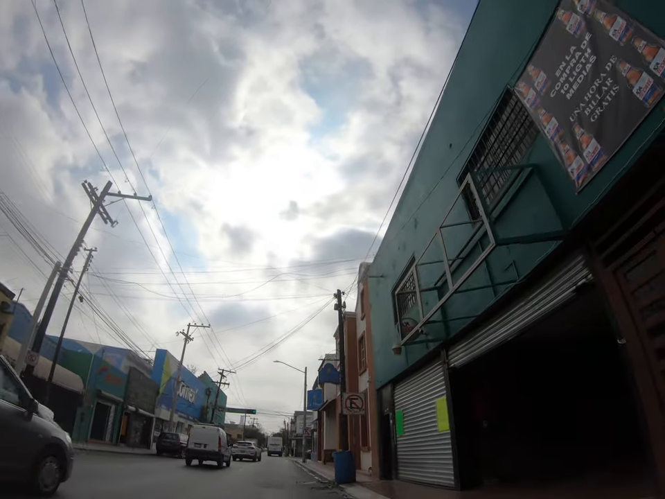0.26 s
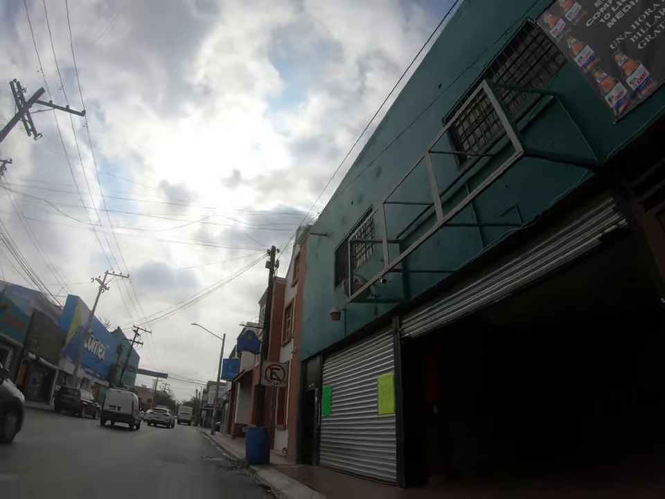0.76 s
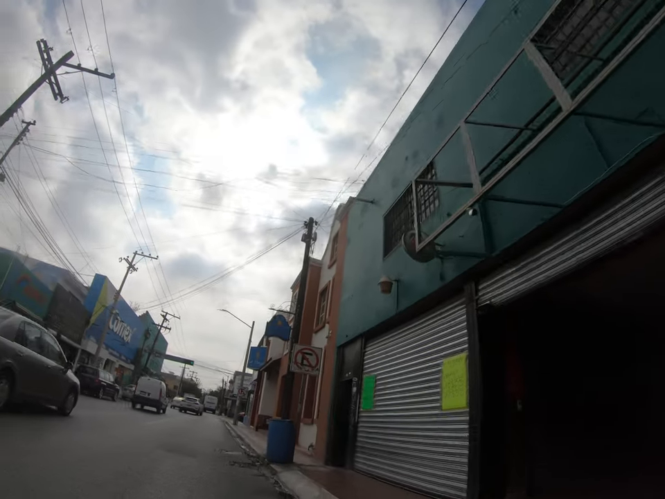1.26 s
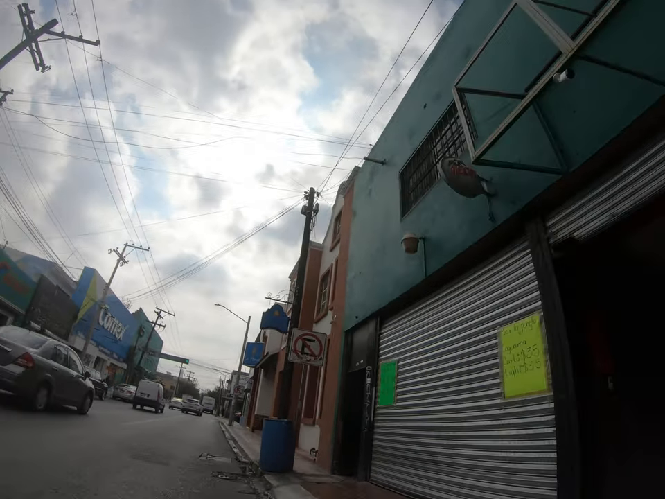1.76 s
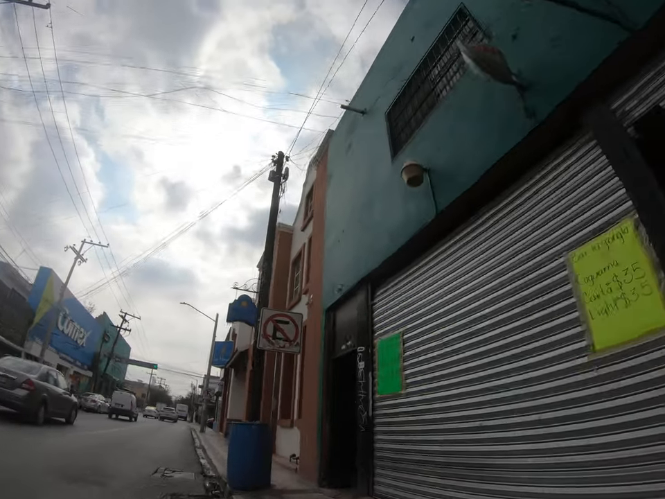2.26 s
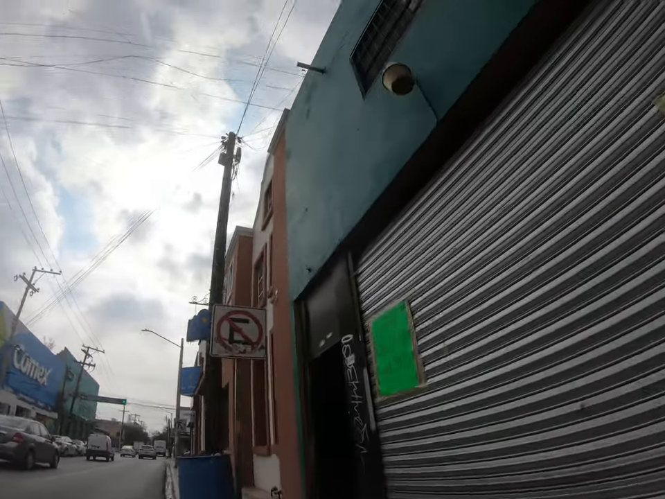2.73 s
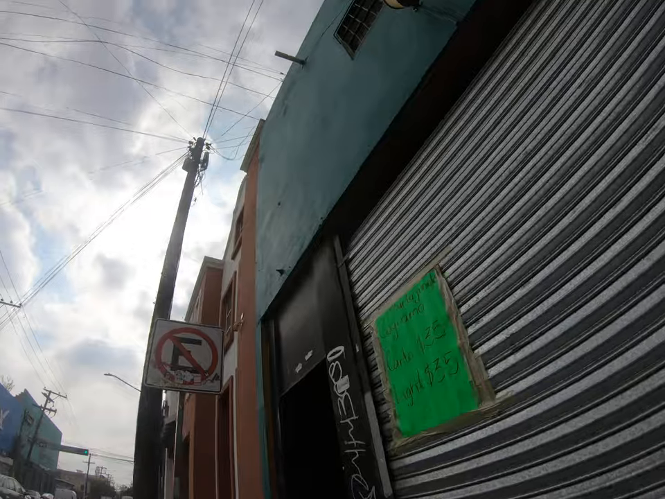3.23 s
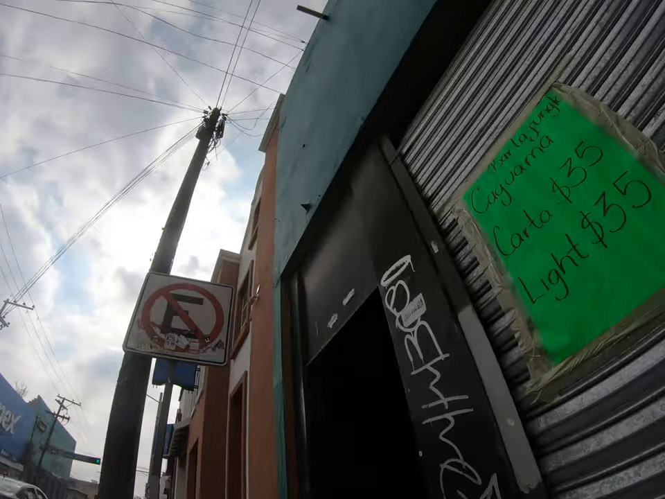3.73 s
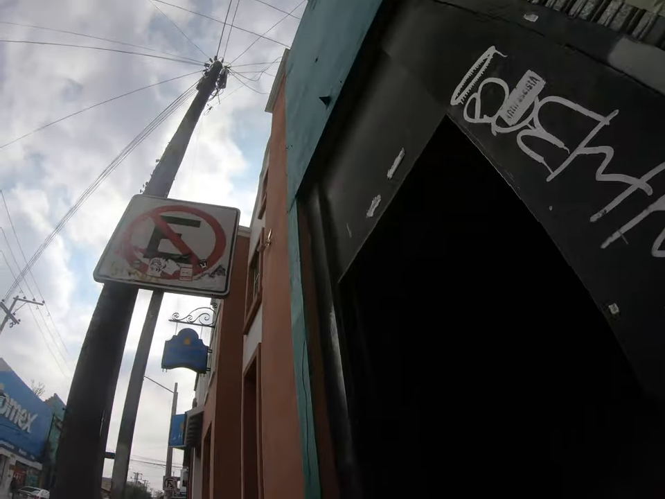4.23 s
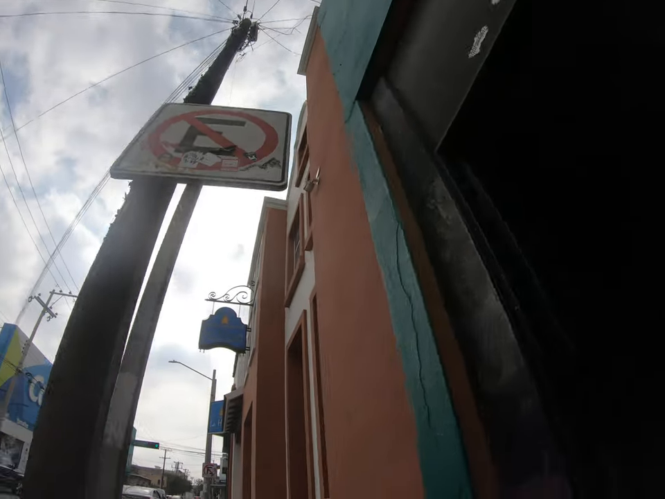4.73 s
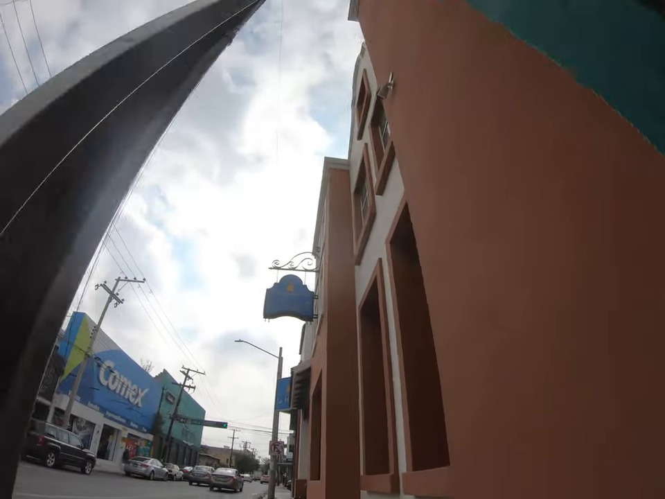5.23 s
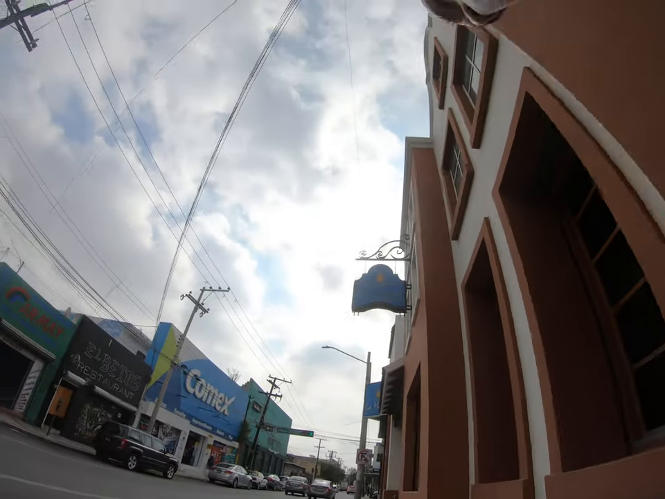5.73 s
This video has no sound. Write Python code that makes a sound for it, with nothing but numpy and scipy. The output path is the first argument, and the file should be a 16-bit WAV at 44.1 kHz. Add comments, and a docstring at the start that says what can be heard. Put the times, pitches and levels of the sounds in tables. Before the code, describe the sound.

A kick scooter is heard very close, rolling over rough concrete beside a street. From 0 to 0.7 s a deep deck rumble grows under tyre hum, fine metallic buzz, gritty crunches and ticking, with knocks near 0.3 s. Hard double clanks hit at 1.05 s, and more follow at 1.4, 1.5, 1.6 and 1.7 s. A thin, fluttering brake squeak sounds from about 1.7 to 2 s as the scooter slows. A knock at 2.1 s and a dense clatter with cracking stones at 2.5-2.65 s precede smooth paving, where the rumble drops sharply. Lighter knocks and scrapes continue around 2.9-3.7 s. A low throbbing drone swells from 3.5 to 4.8 s, strongest around 4.2-4.5 s, with a heavy thud at 4.2 s. Ringing frame clanks cluster at 4.9-5.1 s, more hits and a dry snap at 5.25-5.4 s, and a final pair at 5.6 s. Soft traffic wash persists, its hiss rising at the end.

```python
"""Rough concrete rumbles under a kick scooter close to the microphone, with traffic all around the sidewalk.
Bumps ring resonances of deck, tyres and steering column; loose fittings tick and buzz; wheels crunch over grit.
Joints clank the frame and the brake squeaks; the scooter slows and smooth paving lets the rumble drop away.
A low drone of beating partials swells briefly; shop fronts echo the hits; the street is shaped noise."""
import sys
import numpy as np
from scipy import signal
from scipy.fft import rfft, irfft
from scipy.io import wavfile
from scipy.ndimage import uniform_filter1d

SR = 44100
rng = np.random.default_rng(int(sys.argv[2]) if len(sys.argv) > 2 else 0)


def unload_audio(sound):
    """Save the sound as a 16-bit wav file, at the path given as the first command line argument."""
    columns = np.transpose(np.atleast_2d(sound))
    # keep every value between -1 and 1, then stretch to whole-number steps
    steps = np.round(np.clip(columns, -1, 1) * 32767)
    wavfile.write(sys.argv[1], SR, steps.astype(np.int16))


N = 263718
TIME = np.arange(N) / SR   # seconds


def from_db(db):
    """Decibels to gain."""
    return 10 ** (np.asarray(db) / 20)


def rms_one(x):
    """Scale to unit rms."""
    return x / np.sqrt(np.mean(x ** 2) + 1e-20)


def in_time(rows):
    """Each column of a curve, sample by sample."""
    s, *columns = np.transpose(rows)
    return [np.interp(TIME, s, c) for c in columns]


def drift(rate):
    """Smooth random wander of spread 1, faster with rate; made at a fortieth of the sample rate."""
    r = np.exp(-80 * np.pi * rate / SR)
    noise = rng.standard_normal(N // 40 + 2002)
    slow = signal.lfilter([1], [1, -2 * r, r * r], noise)[2000:]   # settled part only
    return np.interp(np.arange(N) / 40, np.arange(len(slow)), rms_one(slow))


def band(x, low_hz, high_hz, order=2):
    """Causal band-pass."""
    edges = [low_hz, min(high_hz, .45 * SR)]
    return signal.sosfilt(signal.butter(order, edges, "band", fs=SR, output="sos"), x + 1e-18)


def colour(x, spectrum):
    """Causal (minimum-phase) filter with the given spectrum and unit power gain."""
    hz, db = np.transpose(spectrum)
    grid = np.log(np.maximum(np.fft.rfftfreq(8192, 1 / SR), 1))
    outside = np.abs(grid - np.clip(grid, np.log(hz[0]), np.log(hz[-1])))
    # beyond the listed frequencies the spectrum falls steeply
    gain = from_db(np.interp(grid, np.log(hz), db) - 30 * outside)
    cepstrum = irfft(np.log(gain))
    response = irfft(np.exp(rfft(2 * cepstrum[:4096], 8192)))
    return signal.fftconvolve(x, response / np.linalg.norm(response))[:N]


def resonate(x, resonances):
    """Parallel resonances with alternating signs."""
    out = 0
    for k, (hz, width, db) in enumerate(resonances):
        r = np.exp(-np.pi * width / SR)
        numerator = np.array([1, 0, -1]) * (1 - r * r) / 2
        denominator = [1, -2 * r * np.cos(2 * np.pi * hz / SR), r * r]
        out = out + (-1) ** k * from_db(db) * signal.lfilter(numerator, denominator, x + 1e-18)
    return out


def ring(x, hz, t60):
    """A unit click sets a decaying sine of starting height 1 ringing."""
    r, w = from_db(-60 / (t60 * SR)), 2 * np.pi * hz / SR
    return signal.lfilter([0, np.sin(w)], [1, -2 * r * np.cos(w), r * r], x + 1e-18)


def clicks(times, db):
    """Single contacts at the given moments."""
    out = np.zeros(N)
    out[(np.atleast_1d(times) * SR).astype(int)] = from_db(db)
    return out


def bursts(times, db, t60, rise_s=0.0016, uneven_db=6.0):
    """Each contact chatters: an uneven spray of tiny impacts that builds quickly and dies away."""
    out, chatter = np.zeros(N), from_db(uneven_db * drift(190))
    for s, gain, decay in zip(times, from_db(db), np.broadcast_to(t60, len(times))):
        start = int(s * SR)
        age = TIME[:min(SR // 3, N - start)]
        shape = np.minimum(age / rise_s, 1) * from_db(-60 * age / max(decay, .002))
        spray = shape * chatter[start:][:len(age)] * rng.standard_normal(len(age))
        # the blow's energy is shared among its impacts
        out[start:][:len(age)] += gain * spray * np.linalg.norm(shape) / np.linalg.norm(spray)
    return out


def grains(per_s, spread_db):
    """Random contacts with stones of uneven size; rms 1."""
    sizes = from_db(spread_db * np.minimum(rng.exponential(1, N), 4)) * rng.choice([-1, 1], N)
    return rms_one(sizes * (rng.random(N) < per_s / SR))


def steady(x, seconds):
    """Hold the short-term rms at 1, as a steady load on the wheels does."""
    return x / np.sqrt(np.abs(uniform_filter1d(x ** 2, int(seconds * SR))) + 1e-12)


def small_parts(x, ringing_db, t60, count=70):
    """Many small resonances of bolts and brackets ring on after each contact."""
    age = TIME[:SR // 4]
    hz = np.geomspace(600, 14000, count) * np.exp(rng.normal(0, .02, count))
    strengths = np.sqrt(hz) * rng.choice([-1, 1], count)
    response = strengths @ np.sin(2 * np.pi * hz[:, None] * age) * from_db(-60 * age / t60)
    rings = signal.fftconvolve(x, response / np.linalg.norm(response))[:N]
    return (x + from_db(ringing_db) * rings) / np.hypot(1, from_db(ringing_db))


FAVOUR_WIDTH = 0.25   # share of the favoured pitch
FAVOUR_DB, OFF_FAVOUR_DB = -1, -2.5   # the favoured resonance; the unfiltered contact


def favour(x, hz):
    """The point of contact brings out one broad resonance."""
    return from_db(OFF_FAVOUR_DB) * x + resonate(x, [(hz, FAVOUR_WIDTH * hz, FAVOUR_DB)])


# Stretches of paving, rough concrete first.
# Each row: moment the wheels reach it in seconds, rumble of the deck in dB.
PAVING = [(0, -25.5), (.28, -22.5), (.72, -19.5), (2.1, -21), (2.69, -35.5), (3.18, -32.5), (3.9, -36),
          (4.9, -36), (5.34, -24), (5.43, -36)]
DECK_SETTLE_S = 0.0065   # time constant of the deck taking up a new surface


def deck_level():
    """The deck's rumble in dB: each stretch of paving sets a level, and the deck settles to it."""
    s, db = np.transpose(PAVING)
    stretch = np.maximum(np.searchsorted(s, TIME, "right") - 1, 0)
    steps = from_db(db[stretch])
    r = np.exp(-1 / (DECK_SETTLE_S * SR))
    return 20 * np.log10(signal.lfilter([1 - r], [1, -r], steps, zi=[r * steps[0]])[0])


# The scooter's speed, told by its tyres.
# Each row: time in seconds, level of the tyres' drone in dB on a scale where cruising is CRUISE_DB.
SPEED = [(0.0, -26), (0.25, -27.5), (0.5, -30), (1.15, -26), (1.3, -30), (1.72, -30), (1.95, -36),
         (2.62, -42), (2.74, -41.5), (2.98, -44), (3.81, -42.5), (3.93, -44), (4.48, -45.5), (4.87, -40.5),
         (4.93, -39), (5.5, -43), (5.66, -57), (5.98, -45)]
CRUISE_DB = -28


def speed_level():
    """Speed in dB relative to cruising."""
    return in_time(SPEED)[0] - CRUISE_DB


# Resonances of the deck, the tyres and the steering column.
# Each row: pitch in Hz, width in Hz, relative level in dB.
DECK = [(33, 28, -9), (70.4, 12.6, 2.5), (104.8, 37.7, -6.5), (136.2, 58, -12)]
TYRE = [(262, 46, -2.5), (314, 30, 2.5), (372.6, 45, 0), (456, 240, -14)]
COLUMN = [(760, 23, 5.5), (1244, 140, -0.5), (1910, 130, 6), (2720, 1300, -18)]
# Spectra of sand ground under the wheels and of its bright grit.
# Each row: frequency in Hz, relative density in dB per Hz.
GRINDING = [(350, -3), (550, 13), (850, 12), (1350, -3), (1650, -13.5), (2000, -12), (2400, -25.5),
            (2850, -19), (3400, -22.5), (4500, -30.5)]
GRIT = [(1500, -8.5), (2800, 19.5), (4300, 10.5), (6300, -1), (8500, -16.5), (11000, -26), (13000, -37.5),
        (16000, -43.5)]
DECK_LUMPS_DB, DECK_LUMPS_PER_S = 1.6, 11   # its uneven surging: spread, wander rate
TYRE_DB, COLUMN_DB = -27.5, -52.5   # at cruising speed
GRIND_DB, GRIND_FOLLOWS = -39.5, 0.47   # at cruising speed; share of the speed's swing in dB
GRIT_DB, GRIT_FOLLOWS = -69.5, 0.7


def rolling():
    """The paving's bumps shake the deck, tyres and steering column; sand grinds under the wheels."""
    speed_db = speed_level()
    deck_shake = band(resonate(grains(per_s=330, spread_db=1.5), DECK), 26, 230)
    deck = steady(deck_shake, seconds=0.06)
    tyre_shake = band(resonate(grains(per_s=900, spread_db=3), TYRE), 150, 580)
    tyre = steady(tyre_shake, seconds=0.16)
    bumps = grains(per_s=450, spread_db=5)
    column = rms_one(band(resonate(bumps, COLUMN), 430, 3100)) * from_db(1.8 * drift(9.2))
    stones = grains(per_s=1100, spread_db=3.5)
    grind = colour(stones, GRINDING) * from_db(1.5 * drift(17))
    fine_stones = colour(grains(per_s=5500, spread_db=4.0), GRIT) * from_db(.8 * drift(30))
    grit = small_parts(fine_stones, ringing_db=-6.5, t60=0.37)

    rumble = from_db(deck_level() + DECK_LUMPS_DB * drift(DECK_LUMPS_PER_S)) * deck
    hum = from_db(speed_db) * (from_db(TYRE_DB) * tyre + from_db(COLUMN_DB) * column)
    grinding = from_db(GRIND_DB + GRIND_FOLLOWS * speed_db) * grind
    return rumble + hum + grinding + from_db(GRIT_DB + GRIT_FOLLOWS * speed_db) * grit


# The traffic around the microphone. Each row: time in seconds, engine rumble in dB, tyre roar in dB,
# hiss of the nearest tyres in dB.
TRAFFIC = [(0, -27, -40, -62.5), (2.5, -29.5, -45, -62), (2.8, -35, -44.5, -68), (3.3, -34, -48.5, -69),
           (4.0, -31.5, -44.5, -67.5), (4.5, -28.5, -47, -69.5), (4.8, -32, -48.5, -75),
           (5.2, -30.5, -44.5, -63), (5.6, -32.5, -43.5, -62), (5.98, -32, -39.5, -58)]
# Spectra of engines, car tyres and the nearest tyres.
# Each row: frequency in Hz, relative density in dB per Hz.
ENGINE_WASH = [(22, 5.5), (45, -2.5), (70, 2), (95, -6.5), (135, 2), (200, -1), (260, -4.5), (400, -20),
               (600, -18), (1200, -40), (3000, -65.5)]
TYRE_ROAR = [(300, -2), (600, -13.5), (800, -4), (1050, 3), (1300, 2), (1600, -3), (1950, -7.5),
             (2300, -17.5), (3100, -24.5), (3800, -35.5), (7000, -50)]
TYRE_HISS = [(1800, -1), (2400, 2.5), (3200, -0.5), (4200, -8.5), (5200, -12), (6800, -17), (8000, -33)]


def street():
    """Engines merge into a low wash, car tyres into a smooth roar that turns to hiss as they come near."""
    engines_db, tyres_db, hiss_db = in_time(TRAFFIC)
    engines = colour(rng.standard_normal(N), ENGINE_WASH)
    tyres = colour(rng.standard_normal(N), TYRE_ROAR)
    hiss = colour(rng.standard_normal(N), TYRE_HISS)
    return from_db(engines_db) * engines + from_db(tyres_db) * tyres + from_db(hiss_db) * hiss


# Resonances of small metal parts. Each row: pitch in Hz, width in Hz, relative level in dB.
BUZZ_MODES = [(5700, 240, 1), (6600, 380, 2), (7850, 300, 2), (8900, 780, -3.5), (12700, 480, -2.5),
              (14000, 740, -18)]
BUZZ_DB, BUZZ_FOLLOWS = -74.5, .9   # at cruising speed; share of the speed's swing in dB
# the brake drags from before it squeaks and makes the fittings buzz harder
DRAG_FROM_S, DRAG_TO_S, DRAG_FADE_S = .95, 1.95, .15
DRAG_DB = 0.5


def buzz():
    """Fine, ceaseless chatter of small metal parts, stronger with speed and while the brake drags."""
    drag = np.clip(np.minimum(TIME - DRAG_FROM_S, DRAG_TO_S - TIME) / DRAG_FADE_S, 0, 1)
    level_db = BUZZ_DB + BUZZ_FOLLOWS * speed_level() + DRAG_DB * drag
    parts = resonate(grains(per_s=2400, spread_db=4.0), BUZZ_MODES)
    chatter = band(parts, 4800, 18000, order=3)
    return from_db(level_db + 0.93 * drift(14)) * rms_one(chatter)


# Faint thin whines: narrow bands of flickering noise.
# Each row: start in seconds, length in seconds, pitch in Hz, level in dB.
WHINES = [(0, 0.15, 6000, -64.5), (1.012, 0.2, 5520, -65.5), (1.47, 0.2, 7500, -75),
          (4.184, 0.37, 6340, -83), (5.617, 0.29, 6780, -79), (5.89, .2, 5230, -67)]
WHINE_WIDTH_HZ, WHINE_FLICKER_DB = 260, 3
WHINE_FADE_S = .08   # centred on each start and end


def whines():
    """Noise passes one narrow band for a moment, fading in and out."""
    out, noise = 0, rng.standard_normal(N) * from_db(WHINE_FLICKER_DB * drift(40))
    for s, length, hz, db in WHINES:
        gate = np.clip(np.minimum(TIME - s, s + length - TIME) / WHINE_FADE_S + .5, 0, 1)
        whine = band(noise, hz - WHINE_WIDTH_HZ / 2, hz + WHINE_WIDTH_HZ / 2)
        out = out + from_db(db) * gate * rms_one(whine)
    return out


# Wheels crunch over grit. Each row: start in seconds, length in seconds, build-up in seconds,
# relative level in dB, sharpness as treble in dB, hiss of fine sand in dB, favoured pitch in Hz.
SCUFFS = [(0, 0.14, .002, -40.5, -53, -73, 890), (0.184, .14, .002, -37.5, -58, -76, 1090),
          (0.413, 0.026, .002, -34.5, -55, -63, 1880), (1.303, 0.17, 0.0069, -37.5, -53.5, -63, 2050),
          (1.478, 0.29, .01, -47, -64, -66, 1910), (1.86, 0.29, 0.025, -61, -68, -70, 1200),
          (2.328, 0.13, 0.016, -40.5, -59.5, -67, 1600), (2.48, 0.15, 0.008, -39.5, -56, -67, 1780),
          (2.582, .034, .004, -32, -52, -61, 1410), (3.13, 0.034, 0.0028, -36.5, -51, -74, 1480),
          (3.237, 0.22, 0.0045, -40, -59.5, -83, 1130), (3.447, 0.06, .015, -42.5, -58, -63, 850),
          (3.512, 0.14, .03, -42.5, -61, -68, 1000), (3.652, 0.039, .004, -36, -55, -66, 1400),
          (4.901, 0.054, 0.0028, -39, -49, -59, 2020), (4.999, 0.17, 0.0035, -38.5, -53.5, -71, 1310),
          (5.217, 0.042, 0.013, -36.5, -53, -59, 1460), (5.435, 0.03, .01, -42, -58.5, -68, 1205),
          (5.48, 0.1, 0.056, -36.5, -49, -71, 1110), (5.865, 0.22, 0.037, -48, -65, -68.5, 1277)]
# Spectra of the crunch and of fine sand. Each row: frequency in Hz, relative density in dB per Hz.
CRUNCH = [(350, 10.5), (600, 5), (900, 7.5), (1300, 3), (1600, -1), (2000, 0), (2400, -15.5), (2800, -8.5),
          (3400, -11), (4500, -29.5)]
SAND = [(4500, -7.5), (5200, -1.5), (6600, 0), (7400, -4.5), (9000, -9), (10500, -22.5)]
SCUFF_SURGE_DB, SCUFF_SURGES_PER_S = 2.2, 35   # the grit lies unevenly: spread, wander rate


def scuffs():
    """Patches of grit rasp under a wheel in uneven surges and set small parts ringing; fine sand hisses along."""
    surge = rms_one(from_db(SCUFF_SURGE_DB * drift(SCUFF_SURGES_PER_S)))
    crunch = steady(grains(per_s=1800, spread_db=3), seconds=0.02) * surge
    body, treble, sand = 0, 0, 0
    for s, length, rise_s, db, sharp_db, sand_db, hz in SCUFFS:
        fade_in = (TIME - s) / rise_s
        fade_out = (s + length - TIME) / (0.7 * length) + .5   # half-way down at the listed length
        patch = crunch * np.clip(np.minimum(fade_in, fade_out), 0, 1)
        body = body + favour(from_db(db) * patch, hz)
        treble = treble + from_db(sharp_db) * patch
        sand = sand + from_db(sand_db) * patch
    rasp = colour(body, CRUNCH) + colour(treble, GRIT) + colour(sand, SAND)
    return small_parts(rasp, ringing_db=-4, t60=.04)


# fainter ticks come by chance, more often the harder the deck shakes
STRAY_PER_S, STRAY_AT_DECK_DB, STRAY_GROWTH = 10, -17.5, 1.8   # rate at that deck level; dB of rate per dB
SCUFF_TICKS_PER_S = 20   # added while a wheel is on grit
STRAY_DB = -53.5
STRAY_SHIMMER_DB = -18.5   # relative to the tick at cruising speed; it fades as the scooter slows


def stray_ticks():
    """Chance ticks of the shaking deck and of grit under the wheels: seconds, tick dB, shimmer dB."""
    on_grit = sum((TIME > t) & (TIME < t + length) for t, length, *_ in SCUFFS)
    shaken_per_s = STRAY_PER_S * from_db(STRAY_GROWTH * (deck_level() - STRAY_AT_DECK_DB))
    happens = rng.random(N) < (shaken_per_s + SCUFF_TICKS_PER_S * on_grit) / SR
    db = np.full(N, STRAY_DB)[happens]
    return [TIME[happens], db, db + STRAY_SHIMMER_DB + speed_level()[happens]]


# The loudest ticks of loose fittings.
# Each row: time in seconds, relative tick level in dB, relative shimmer level in dB.
TICKS = [(0.11, -43, -62), (0.142, -40, -89), (0.1953, -35.5, -66), (0.234, -42, -77), (0.3636, -45, -59),
         (0.445, -48, -56), (0.48, -46, -56), (0.59, -49, -66), (0.692, -38, -51), (0.742, -42, -53),
         (0.821, -42.5, -68), (1.05, -30, -56), (1.066, -31.5, -54), (1.107, -37, -71), (1.218, -45, -73),
         (1.332, -41, -69), (1.365, -36.5, -66), (1.393, -37, -70), (1.424, -41, -72),
         (1.501, -29.5, -46.5), (1.542, -40, -54), (1.581, -44, -70), (1.605, -37, -60), (1.654, -39, -57),
         (1.684, -34.5, -50), (1.855, -42, -51), (1.979, -47, -67), (2.028, -52, -85), (2.081, -46, -63),
         (2.555, -39, -75), (3.1926, -49, -82), (3.227, -41, -73), (3.271, -56, -83), (3.319, -44.5, -86),
         (3.45, -42, -79), (3.565, -48, -78), (3.61, -52, -71), (3.652, -45, -78), (3.688, -38, -74),
         (3.724, -43, -72), (4.2998, -41, -66), (4.501, -40, -60), (4.9787, -41, -61), (4.99, -42, -66),
         (5.0786, -35, -59), (5.095, -44, -66), (5.238, -45, -50), (5.329, -27, -48), (5.582, -40, -75)]
# Resonances of the fittings. Each row: pitch in Hz, width in Hz, relative level in dB.
FITTINGS = [(2810, 320, 4), (4400, 1220, -3.5), (5790, 2320, -0.5), (7280, 2450, -2.5), (8600, 940, -6)]
KNOCK_TICK_DB, KNOCK_SHIMMER_DB = -20, -55.5   # a knock also shakes the fittings, relative to its level


def rattles():
    """Loose fittings tick sharply and shimmer for a moment, on their own and at every knock."""
    at, knock_db, _, _ = contacts()
    shaken = [at, knock_db + KNOCK_TICK_DB, knock_db + KNOCK_SHIMMER_DB]
    s, db, shimmer_db = np.hstack([np.transpose(TICKS), shaken, stray_ticks()])
    sharp = bursts(s, db + 7.5, t60=0.02, rise_s=0.002)
    tail = bursts(s, db - 15.5, t60=0.13)
    tick = resonate(sharp + tail, FITTINGS)
    shimmer = band(bursts(s, shimmer_db + 13.0, t60=.024), 11950, 14200)
    return small_parts(tick + shimmer, ringing_db=-7, t60=.05)


# Wheels strike joints and stones. Each row: time in seconds, relative level in dB, hard edge in dB,
# clatter t60 in seconds, rebound in dB relative to the blow, deck bounce in dB, bounce pitch in Hz,
# clatter build-up in seconds, frame ring in dB, favoured pitch in Hz.
KNOCKS = [(0.251, -33, -45, .022, -12, -31, 100, 0.00058, -52, 1150),
          (0.288, -22, -41, 0.022, -9, -35, 100, 0.0022, -45, 1900),
          (.366, -28, -53, 0.052, -14, -10, 310, 0.0018, -56, 700),
          (.659, -40, -57, 0.02, -17, -15, 322, .001, -48, 1160),
          (1.048, -19.5, -30, 0.032, -18, -33, 99, 0.0013, -39, 2030),
          (1.068, -19, -32, 0.029, -15, -26, 99, 0.00087, -38, 1100),
          (1.379, -23, -35, 0.039, -13, -29, 100, 0.0023, -41, 1950),
          (1.51, -16, -44, 0.025, -12, -26, 99, 0.002, -35, 2030),
          (1.605, -21.5, -35, 0.028, -12, -32, 100, 0.0012, -47, 1970),
          (1.714, -22, -43.5, 0.026, -11, -37, 101, 0.0016, -32.5, 1110),
          (2.074, -21.5, -31.5, 0.018, -19, -36, 100, 0.00053, -50.5, 1000),
          (2.081, -23.5, -46, 0.016, -23, -38, 100, 0.00044, -52, 990),
          (2.507, -26, -39, 0.036, -17, -39, 101.6, 0.0016, -53, 1900),
          (2.533, -24, -27, 0.026, -8, -14, 128, 0.00081, -43, 1510),
          (2.557, -41, -44, .04, -20, -16.5, 135.7, 0.00087, -45, 1100),
          (2.588, -20.5, -40, 0.033, -22, -9, 130, 0.0011, -37, 1800),
          (2.6, -28, -41, 0.02, -26, -33, 130, 0.00098, -35, 1200),
          (2.613, -20.5, -31, 0.015, -29, -9, 42.9, 0.0014, -44, 1050),
          (2.659, -26.5, -38, 0.056, -18, -37, 59.4, 0.0013, -51, 1500),
          (2.928, -29.5, -44, 0.2, -7, -27.5, 86, 0.00084, -57, 1110),
          (3.195, -31.5, -38, 0.1, -12, -37.5, 100, 0.0023, -44, 1000),
          (3.225, -26, -31, 0.025, -11, -27, 100, 0.001, -56, 1900),
          (3.469, -18.5, -31, 0.032, -7, -45, 99, 0.0015, -38.5, 680),
          (3.538, -21.5, -32, 0.022, -8.5, -49, 100, 0.00122, -39.5, 1240),
          (3.611, -26, -40, 0.04, -18, -31, 100, .002, -55, 1600),
          (3.686, -29.5, -42, 0.084, -22, -41, 100, 0.00292, -41, 704),
          (4.201, -11.5, -23, 0.034, -41, -16.5, 179, 0.003, -33, 540),
          (4.906, -20.5, -29, 0.12, -24, -11, 111, 0.0043, -28, 810),
          (4.947, -37, -33, 0.046, -7, -13.5, 195, 0.0022, -40, 1460),
          (4.961, -25.5, -48, 0.049, -4.5, -17, 169, 0.0013, -35.5, 455),
          (5.014, -19.5, -26.5, 0.083, -12, -13, 146.7, 0.0052, -23, 1300),
          (5.079, -20, -29, 0.027, -12, -21, 103, 0.00099, -33, 1030),
          (5.244, -25.5, -36, .07, -12, -42, 101, 0.0034, -48, 2370),
          (5.273, -36, -55, 0.047, -20, -44, 101, 0.0032, -38.5, 556),
          (5.316, -19.5, -38, 0.064, -3, -35, 100, 0.0029, -35, 800),
          (5.33, -18.5, -44, 0.059, -21, -16, 54, 0.003, -38.5, 1590),
          (5.578, -19.5, -22, 0.042, -14, -15, 165, 0.0011, -48, 806),
          (5.597, -22, -22, 0.025, -22, -17.5, 68.6, 0.0023, -40, 2090)]
REBOUND_S = 0.024   # the wheel lands again after each knock


def contacts():
    """Every knock and its rebound: seconds, relative level dB, hard edge dB, clatter t60 s."""
    s, db, hard_db, t60, rebound_db = np.transpose(KNOCKS)[:5]
    rebounds = [s + REBOUND_S, db + rebound_db, hard_db + rebound_db, t60]
    return np.hstack([[s, db, hard_db, t60], rebounds])


# Spectrum of the clatter. Each row: frequency in Hz, relative density in dB per Hz.
KNOCK_BODY = [(200, 14), (450, 6), (1000, 0), (1400, 0.5), (2050, -3.5), (2600, -9.5), (3500, -28)]
STRIKE_DB = 14   # the wheel's one solid impact, relative to the clatter that it sets off
EDGE_RISE_S = .002   # hard contacts build up at once
BOUNCE_CYCLES = 14.5   # until the deck's bounce has died away
BOUNCE_LONGEST_S = 0.33   # the rider's legs damp the slowest bounces
HEAVY_REBOUND_DB = -4   # above this it is the rebound that bounces the deck


def knocks():
    """A joint gives a solid strike, a hollow clatter of its own pitch, a hard edge and a bounce of the deck."""
    s, _, hard_db, t60 = contacts()
    edge_bursts = bursts(s, hard_db - 1.0, t60, rise_s=EDGE_RISE_S, uneven_db=0.0)
    edge = band(edge_bursts, 2700, 4170)
    clatter, bounce = 0, 0
    for at, db, _, decay, rebound_db, bounce_db, hz, rise_s, _, favoured_hz in KNOCKS:
        strike = clicks(at + rise_s, db + STRIKE_DB)
        spray = bursts([at, at + REBOUND_S], [db, db + rebound_db], decay, rise_s, uneven_db=3.5)
        clatter = clatter + favour(strike + spray, favoured_hz)
        landing = at + REBOUND_S * (rebound_db > HEAVY_REBOUND_DB)
        bounce_t60 = min(BOUNCE_CYCLES / hz, BOUNCE_LONGEST_S)
        bounce = bounce + ring(clicks(landing, bounce_db), hz, bounce_t60)
    return colour(clatter, KNOCK_BODY) + edge + bounce


# Modes of the frame. Each row: pitch in Hz, relative level in dB, t60 in seconds.
FRAME = [(429, 5, 0.44), (576, -1.5, 0.1), (624, -6.5, 0.075), (780, 4, 0.19), (874, -5, 0.054),
         (1000, -2.5, 0.21), (1234, -1, 0.2), (1348, -2.5, 0.082), (1430, -6.5, 0.18), (1560, -19, 0.066),
         (2010, -7, 0.11), (2280, -12.5, 0.14), (2740, 5.5, 0.028), (3580, -17, .08)]
# the tubes are not quite round: each mode has a twin this share higher, struck a moment later
TWIN_SPLIT, TWIN_DB, TWIN_LAG_S = 0.038, -6.5, .007
# small parts at a hard blow: relative level at that frame ring, dB gained per dB of ring
JINGLE_DB, JINGLE_AT_RING_DB, JINGLE_GROWTH = -42.5, -22, 1.5


def clanks():
    """Hard blows ring the frame's paired modes, most near the favoured pitch, and set small parts jingling."""
    s, *_, rise_s, db, focus_hz = np.transpose(KNOCKS)
    frame = 0
    for k, (hz, mode_db, t60) in enumerate(FRAME):
        octaves_off = np.abs(np.log2(hz / focus_hz))
        struck_db = db + mode_db - 15 * octaves_off
        mode = ring(clicks(s + rise_s, struck_db), hz, t60)
        twin_blow = clicks(s + rise_s + TWIN_LAG_S, struck_db + TWIN_DB)
        twin = ring(twin_blow, hz * (1 + TWIN_SPLIT), t60)
        frame = frame + (-1) ** k * (mode + twin)
    chatter = bursts(s, JINGLE_DB + JINGLE_GROWTH * (db - JINGLE_AT_RING_DB), t60=0.36)
    return frame + band(chatter, 12100, 13900) + from_db(-1) * band(chatter, 2500, 6900)


# Small stones crack under a wheel. Each row: time in seconds, relative level in dB.
CRACKS = [(1.049, -26), (1.069, -32), (1.381, -33), (1.425, -35), (1.604, -33), (2.394, -31.5),
          (2.508, -38), (2.534, -29.5), (2.588, -32), (2.613, -20), (2.66, -37), (2.93, -36), (3.226, -28),
          (3.349, -38), (3.623, -36), (3.724, -40), (4.203, -31), (4.948, -31), (5.015, -24), (5.077, -27),
          (5.582, -30), (5.599, -24)]
# Spectrum of a crack. Each row: frequency in Hz, relative density in dB per Hz.
CRACK_BODY = [(1800, 2), (2800, 6.5), (4400, -3), (5200, -17.5), (9000, -27)]
CRACK_T60_S, CRACK_RISE_S = 0.0073, .0007


def cracks():
    """A small stone gives way with a short, bright crack."""
    s, db = np.transpose(CRACKS)
    return colour(bursts(s, db, CRACK_T60_S, rise_s=CRACK_RISE_S, uneven_db=-1.0), CRACK_BODY)


# The brake squeaks. Each row: time in seconds, low mode in relative dB, upper modes in relative dB,
# pitch as a multiple of rest.
SQUEAK = [(1.70, -81, -63, 1.0), (1.73, -56, -65, 1.0), (1.755, -64, -59, .99), (1.775, -57.5, -60, 1.0),
          (1.815, -68, -65, 1.0), (1.828, -52.5, -62, .995), (1.845, -60, -61, 1.003),
          (1.857, -50.5, -68, 1.032), (1.9, -62, -75, 1.03), (1.95, -66, -74, 1.0), (1.99, -66, -79, 1.0),
          (2.06, -79.5, -85, 1.0)]
# The brake's modes, the low one first.
# Each row: pitch at rest in Hz, relative level in dB, share of the bend that it follows.
BRAKE = [(3410, 0, .1), (4390, -2.5, 0), (5160, 0, 1), (9650, -20, .3)]
SQUEAK_ROUGH, SQUEAK_FLUTTER_DB = .012, 7   # pitch jitter as a share; flutter of the grip
SQUEAK_SLIP, SQUEAK_SLIP_HZ = .5, 140   # share and width of the rasp where the grip slips


def squeak():
    """The brake rubs: its modes sing roughly, rasp and flutter with the grip; they follow pitch bends unequally."""
    low_db, upper_db, bend = in_time(SQUEAK)
    out, shared = 0, drift(45)
    for k, (hz, db, follows) in enumerate(BRAKE):
        pitch_hz = hz * (1 + follows * (bend - 1)) * (1 + SQUEAK_ROUGH * drift(420))
        phase = 2 * np.pi * np.cumsum(pitch_hz) / SR
        grip = rms_one(from_db(SQUEAK_FLUTTER_DB * np.tanh(shared + drift(110))))
        rasp = SQUEAK_SLIP * drift(SQUEAK_SLIP_HZ) * np.cos(phase)
        voice = rms_one(grip * np.sin(phase) + rasp)
        out = out + from_db((upper_db if k else low_db) + db + 4) * voice
    return out * (TIME > SQUEAK[0][0]) * (TIME < SQUEAK[-1][0])


# A low drone swells. Each row: time in seconds, pulse rate in Hz, level in dB.
HUM = [(3.45, 26.77, -47), (3.65, 27.96, -28.5), (3.9, 31, -34), (4.1, 37.6, -34), (4.24, 38.43, -22.5),
       (4.49, 39.37, -23.5), (4.62, 37.64, -41.5), (4.72, 33.27, -24), (4.78, 33.6, -44), (4.9, 34.23, -67)]
# The drone's partials. Each row: multiple of the pulse rate, relative level in dB.
HUM_ORDERS = [(3, -24.5), (4, -3), (5, 2), (6, -19), (7, -35.5), (8, -39), (11, -27.5), (15, -23)]


def drone():
    """Neighbouring partials of a slow pulse beat into a throbbing hum, like an exhaust in the street."""
    hz, db = in_time(HUM)
    phase = 2 * np.pi * np.cumsum(hz * (1 + 0.0123 * drift(25))) / SR
    tone = 0
    for k, order_db in HUM_ORDERS:
        partial = np.sin(k * phase + rng.uniform(0, 2 * np.pi))
        tone = tone + from_db(order_db + 2 * drift(41)) * partial
    return from_db(db) * steady(tone, seconds=0.13)


# One dry snap. The row: time in seconds, level in dB of the click before filtering.
SNAP = (5.4003, 11.5)


def snap():
    """A single dry snap: a click filtered to leave no bass and no top."""
    crack = band(clicks(*SNAP), 700, 1800, order=2)
    steep = signal.cheby1(6, .5, [600, 3700], "band", fs=SR, output="sos")
    return signal.sosfilt(steep, crack + 1e-18)


def shop_fronts(x):
    """Walls and shutters throw back a short, dull scatter, starting 9 ms after the sound."""
    age = TIME[:SR // 2]
    scatter = band(rng.standard_normal(len(age)), 200, 5500) * from_db(-60 * age / 0.36) * (age > .009)
    return signal.fftconvolve(x, scatter / np.linalg.norm(scatter))[:N]


def scene():
    """The scooter close to the microphone, its echo from the shop fronts and the street around."""
    hits = rattles() + knocks() + cracks() + clanks() + scuffs() + squeak()
    scooter = rolling() + buzz() + whines() + hits + snap()
    echo = from_db(-19.5) * shop_fronts(hits)
    return (scooter + echo + drone() + street())[None]


CUTOFF_HZ = 15800


def record(dry):
    """At the microphone's end the top is cut steeply by a low-pass filter."""
    return signal.sosfilt(signal.ellip(10, .1, 80, CUTOFF_HZ, fs=SR, output="sos"), dry)


dry = scene()
out = record(dry)
unload_audio(out)
```